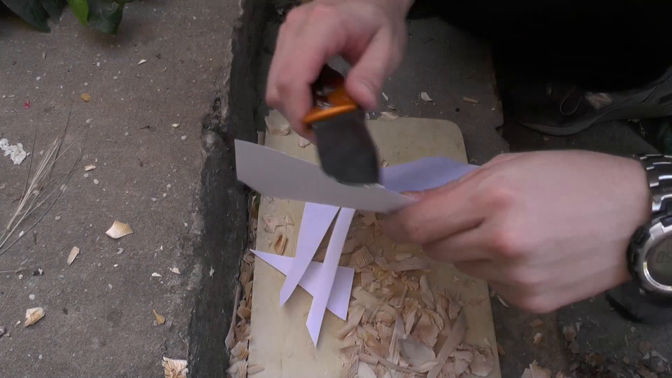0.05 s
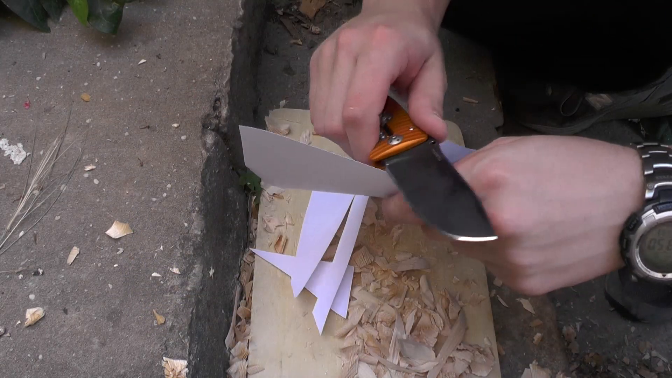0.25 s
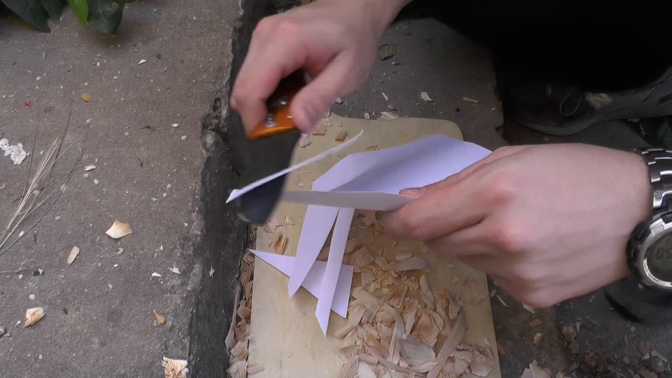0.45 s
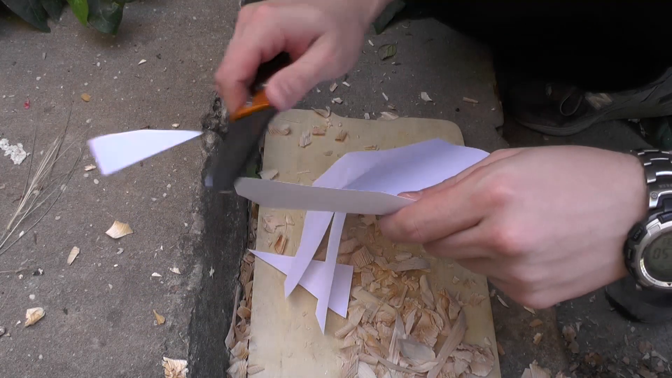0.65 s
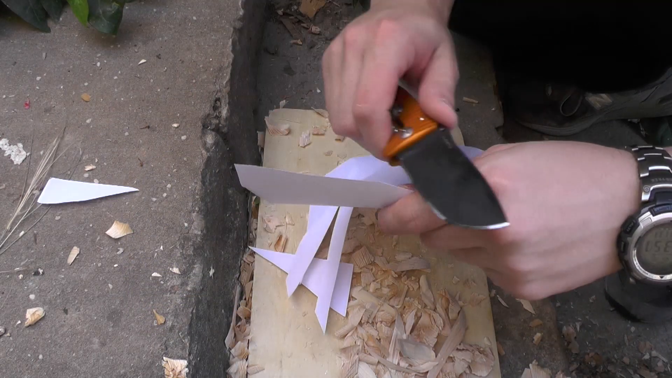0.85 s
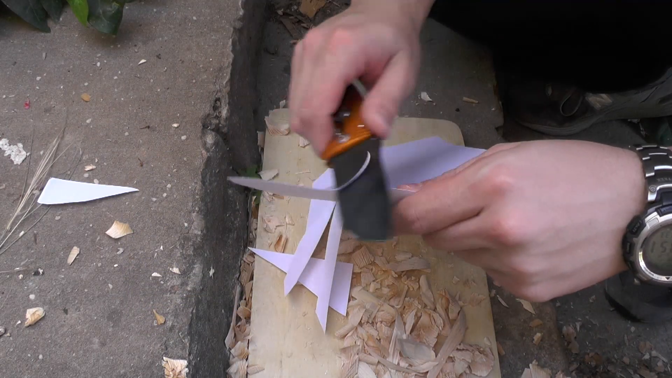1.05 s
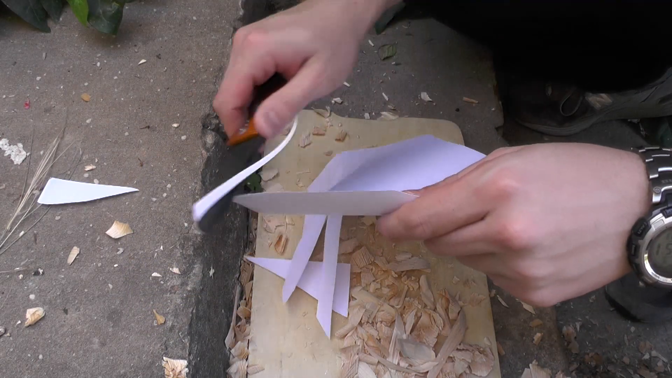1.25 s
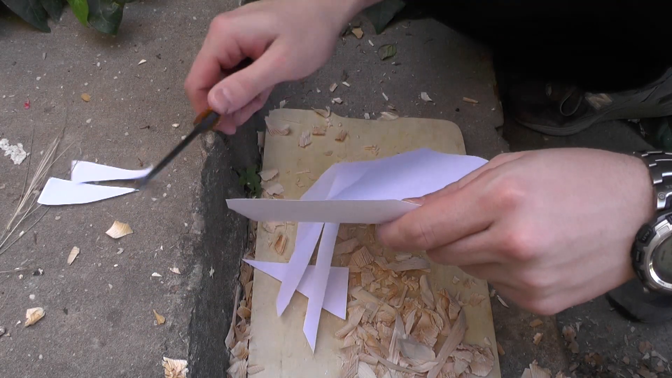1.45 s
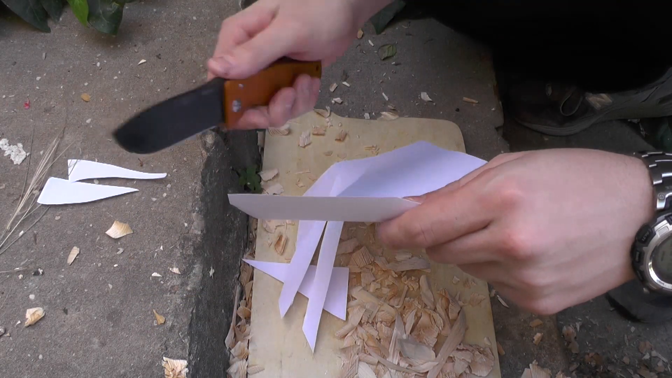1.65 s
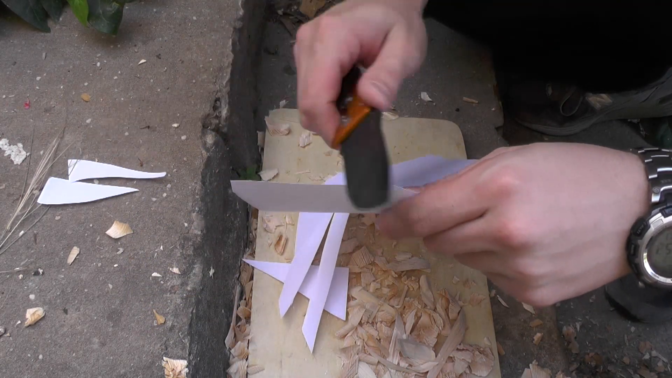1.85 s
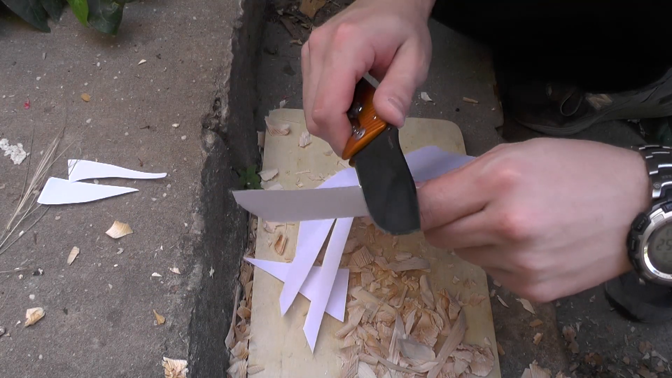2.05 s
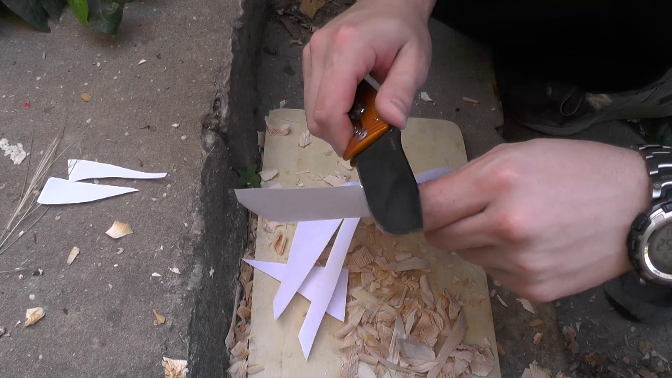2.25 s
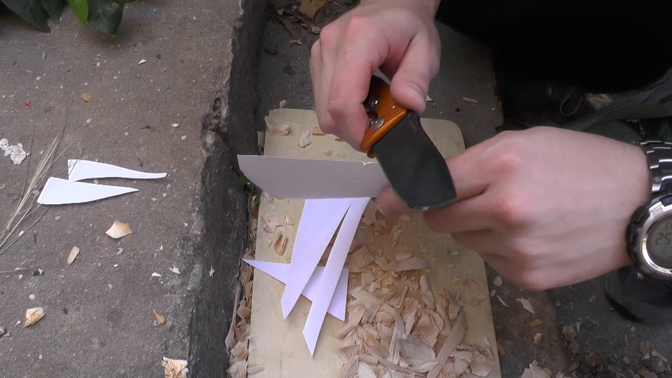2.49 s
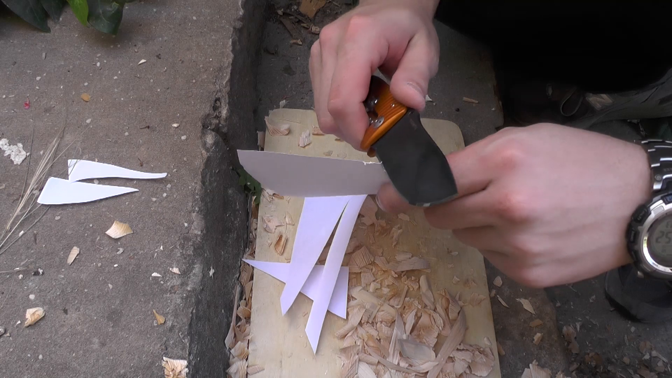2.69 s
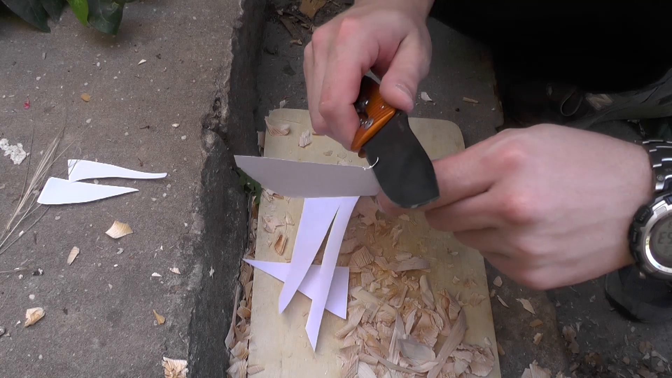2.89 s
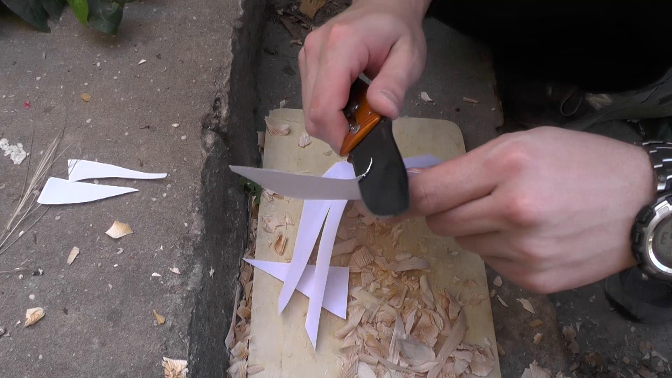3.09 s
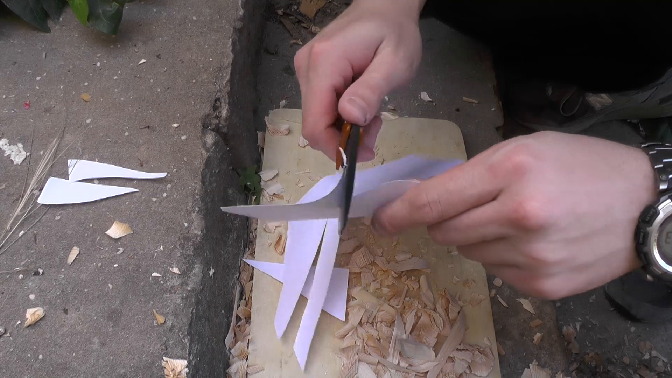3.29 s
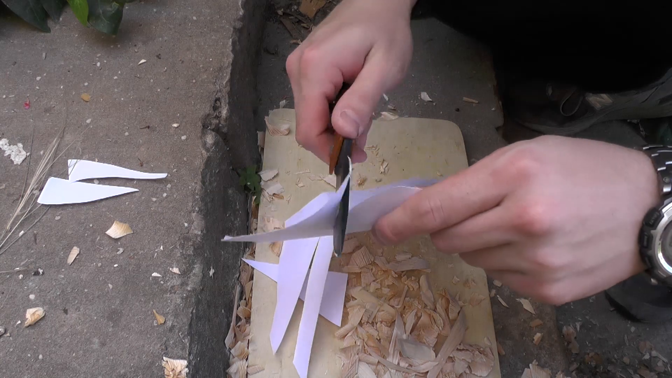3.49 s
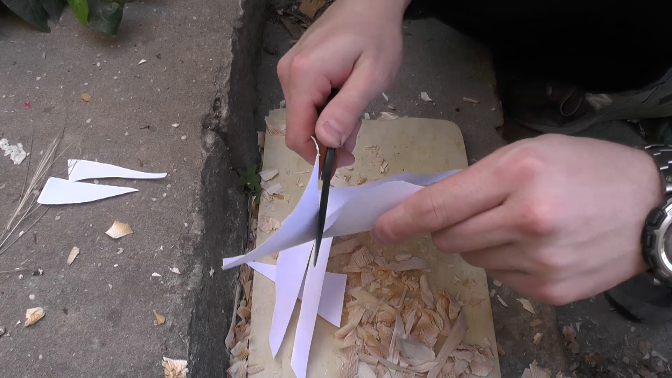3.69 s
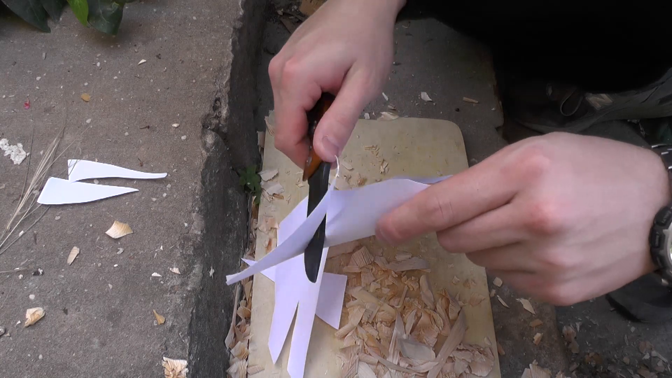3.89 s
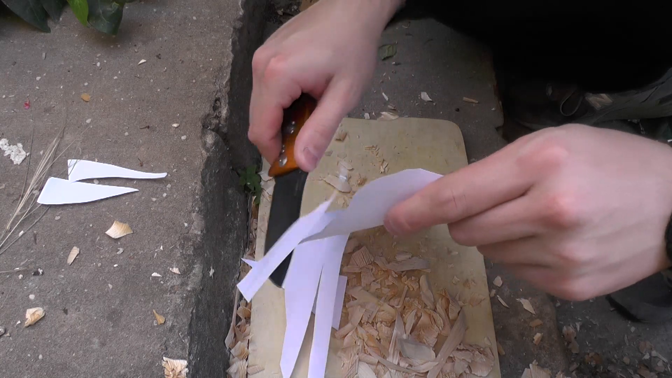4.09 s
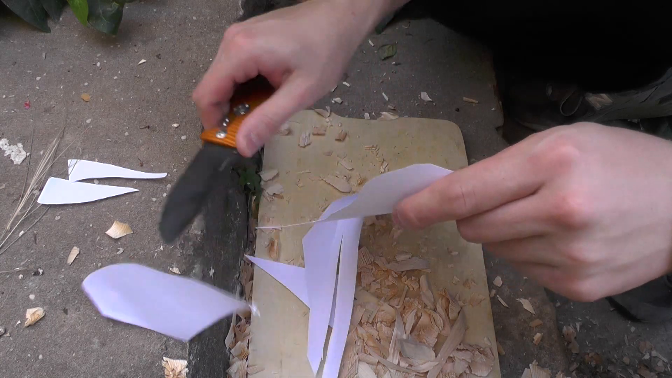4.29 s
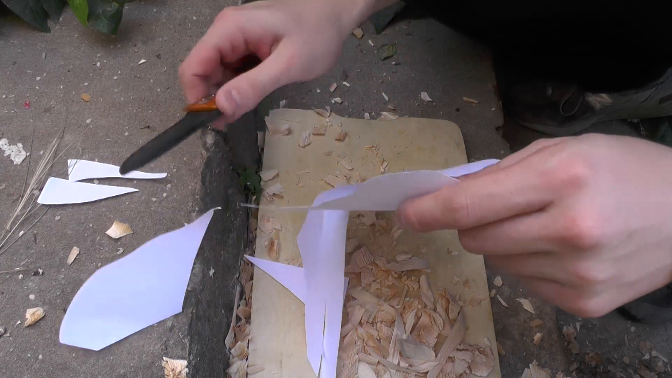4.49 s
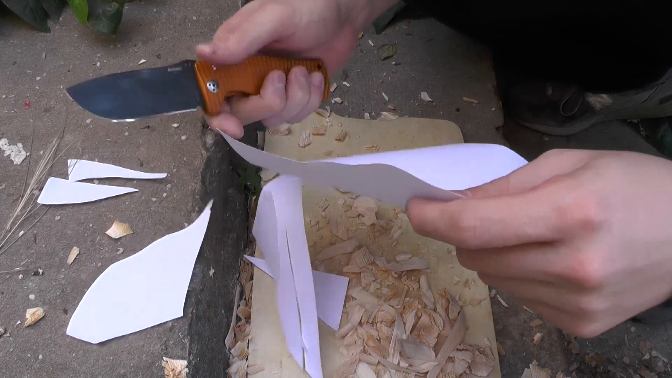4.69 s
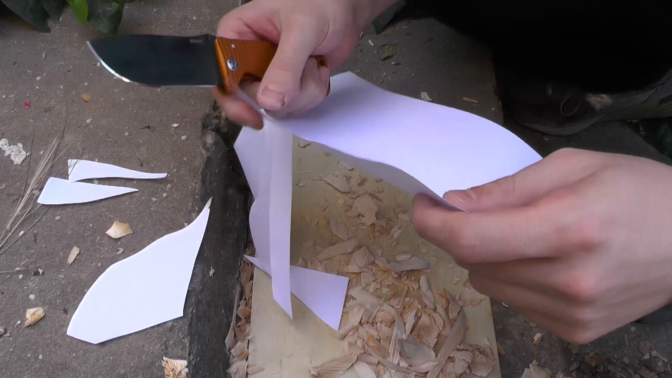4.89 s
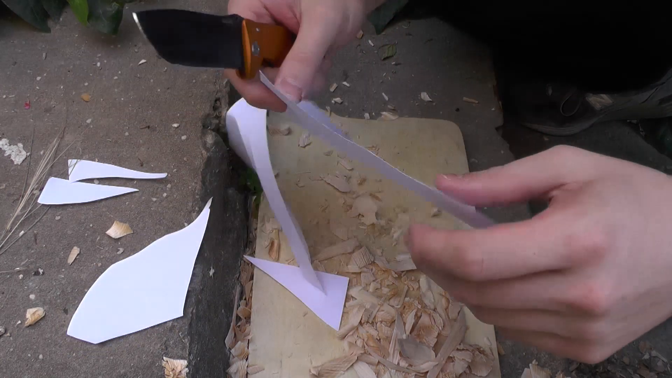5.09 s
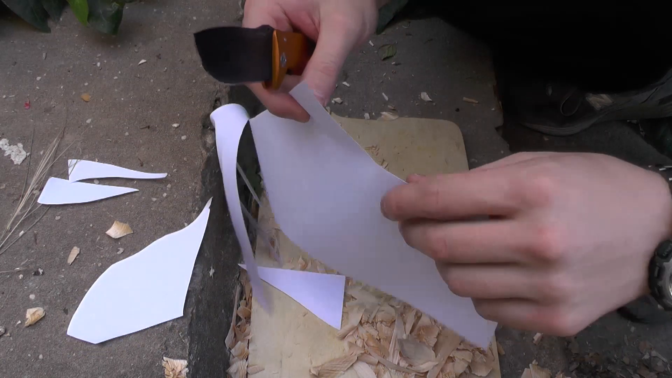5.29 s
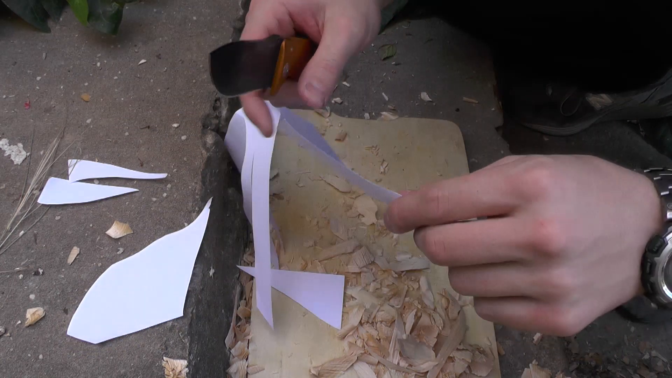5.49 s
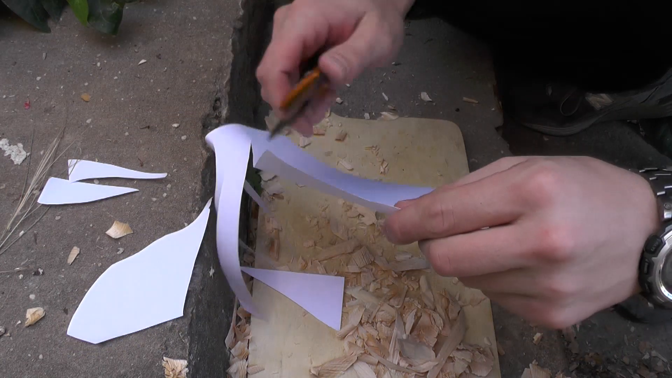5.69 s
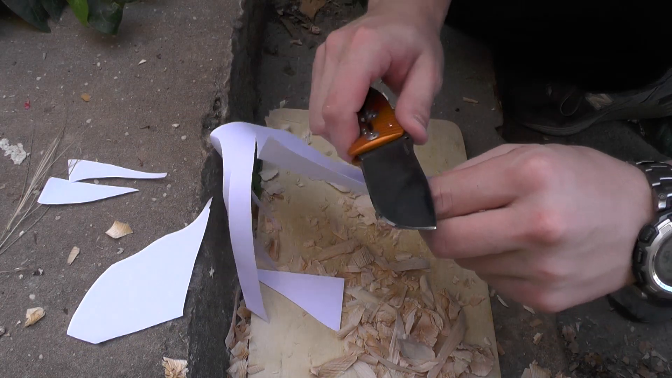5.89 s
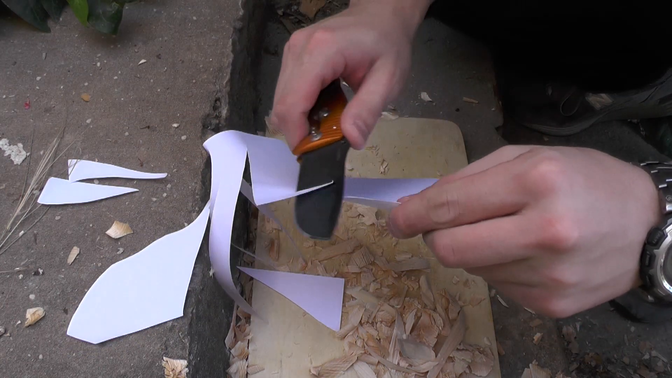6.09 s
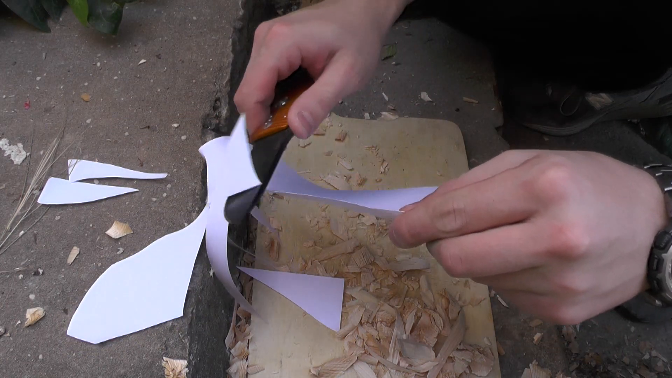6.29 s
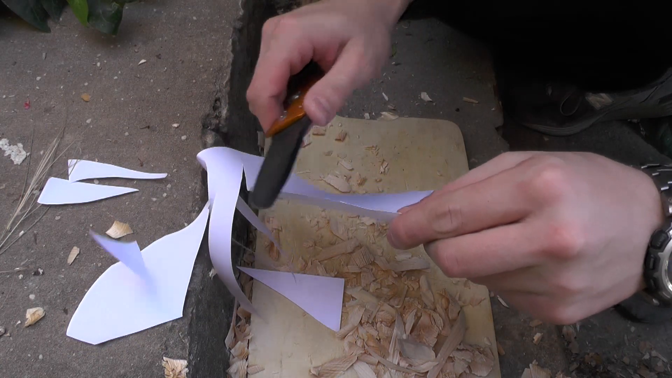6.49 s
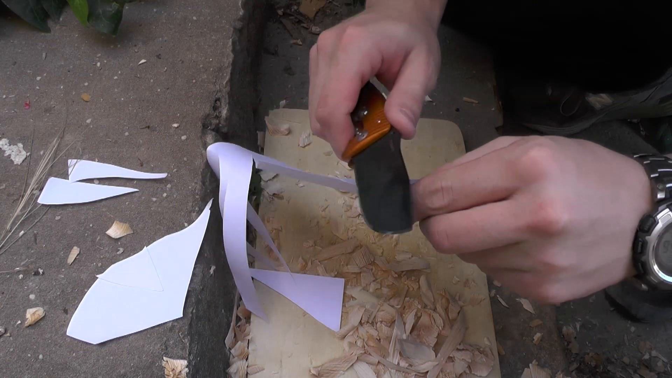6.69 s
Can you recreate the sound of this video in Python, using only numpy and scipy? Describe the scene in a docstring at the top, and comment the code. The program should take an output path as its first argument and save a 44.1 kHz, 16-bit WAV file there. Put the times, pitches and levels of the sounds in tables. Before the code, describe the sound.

A knife slices a hand-held sheet of paper in quick crisp zips, then one long rising tear-like cut, with rustles, flicks and light landings.

```python
"""Over a concrete floor, close to one microphone, a knife slices a hand-held sheet of paper over low noise.
Three quick cuts come first: snapping fibres ring the sheet; between them it rubs, scraps land, steel rings.
A slow cut follows from 2.7 to 4.2 s, its gliding resonances rising as the uncut paper shortens, amid air puffs.
The sheet then rubs, flicks and ticks as its modes and creases are shaken, until a fourth quick cut at 6 s.
At the end the last strip meets the floor with a scuff and a ping."""
import sys
import numpy as np
from scipy import signal
from scipy.fft import rfft, irfft, next_fast_len
from scipy.io import wavfile
from scipy.ndimage import uniform_filter1d, map_coordinates

SR = 44100
rng = np.random.default_rng(int(sys.argv[2]) if len(sys.argv) > 2 else 0)


def wrap_up_sound(samples):
    """Save the sound to the file named by the first command line argument, as 16-bit audio."""
    columns = np.atleast_2d(samples).T
    # keep every value between -1 and 1, then stretch to whole-number steps
    tamed = np.clip(columns, -1, 1)
    steps = np.round(tamed * 32767).astype(np.int16)
    wavfile.write(sys.argv[1], SR, steps)


N = 297586

# quick knife strokes: start t/s, end t/s, force level/dB, build-up t/s, easing off t/s,
# edge hiss level/dB re force, fastest moment t/s, flap level/dB re force, strip resonance f/Hz
QUICK_CUTS = [(0.3127, 0.518, -20, 0.058, 0.012, -1.3, 0.402, -25.5, 2590),
              (1.02, 1.256, -21, 0.021, 0.0017, -2.3, 1.127, -23, 2610),
              (2.012, 2.078, -30.5, 0.0018, 0.0084, -8, 2.068, -15.5, 2320),
              (6.018, 6.273, -21, 0.083, 0.05, -3, 6.1, -22, 4200)]
CUT_RELEASE_S = 0.004


def amp(db):
    """Decibels to gain."""
    return 10 ** (np.asarray(db) / 20)


def unit(x):
    """Scale to rms 1."""
    return x / np.sqrt(np.mean(x ** 2) + 1e-20)


def along(points, hz):
    """Read (Hz, value) points on a log frequency axis."""
    f, v = np.transpose(points)
    return np.interp(np.log(hz + 1), np.log(f + 1), v)


def clock():
    """Time of every sample in seconds."""
    return np.arange(N) / SR


def wobble(rate):
    """A smooth random curve, rate knots a second."""
    knots = rng.standard_normal(int(N * rate / SR) + 4)
    return map_coordinates(knots, [clock() * rate])


def filtered(x, response):
    """x times a response of frequency."""
    m = next_fast_len(len(x) + 8192)
    hz = np.fft.rfftfreq(m, 1 / SR)
    return irfft(rfft(x, m) * response(hz), m)[:len(x)]


def band(x, lo_hz, hi_hz):
    """One band of x, its slow level held at 1."""
    y = filtered(x, lambda hz: ((1 + (lo_hz / (hz + 1)) ** 12) * (1 + (hz / hi_hz) ** 12)) ** -.5)
    slow_power = np.abs(uniform_filter1d(y ** 2, size=3000))
    return y / np.sqrt(slow_power + 1e-12)


def gate(start, end, attack, release):
    """Contact rises when a stroke starts, holds near 1 and dies away after its end."""
    t = clock()
    rise = 1 - np.exp(-np.maximum(t - start, 0) / attack)
    return rise * np.exp(-np.minimum(np.maximum(t - end, 0) / release, 20))


def background():
    """Steady low noise of the surroundings whose middle swells slowly."""
    # spectral shape of the place: f/Hz, relative level/dB per Hz
    place_colour = [(20, -10), (60, -1), (160, 0), (340, -7), (750, -5.5), (1300, -9.5), (1900, -16.5),
                    (2400, -21), (3200, -22), (5000, -26), (8000, -33), (10000, -30), (15500, -29)]
    air = unit(filtered(rng.standard_normal(N), lambda hz: amp(along(place_colour, hz))))
    middle_shape = [(200, -21.5), (550, 11.5), (1600, 11.5), (5000, -28)]
    middle = filtered(air, lambda hz: amp(along(middle_shape, hz)))
    swell = amp(0.3 * wobble(1.5))  # the boosted middle deepens this small swell
    return amp(-52.5) * (air + (swell - 1) * middle)


def room(x):
    """A short scatter from the floor and nearby walls, as noise that decays faster in the treble."""
    # decay by frequency: f/Hz, t60/s
    decay_times = [(200, 0.35), (2000, 0.09), (12000, 0.08)]
    hz, t, z = signal.stft(rng.standard_normal(SR // 3), SR, nperseg=256)
    decay = amp(-60 * t / along(decay_times, hz)[:, None])
    tail = signal.istft(z * decay, SR, nperseg=256)[1]
    delayed = np.pad(tail, (SR // 300, 0))
    return signal.fftconvolve(x, delayed / np.linalg.norm(tail))[:N]


def puffs():
    """The moving sheet pushes soft low buffets of air against the microphone."""
    # buffets: t/s, level/dB, half length t/s (to 1/e)
    buffets = [(3.57, -49, .05), (3.81, -38.5, .045), (4.17, -48, .03)]
    push = sum(amp(db) * np.exp(-((clock() - s) / length) ** 2) for s, db, length in buffets)
    colour = [(20, -10), (50, 0), (110, -5), (300, -24), (2000, -80)]
    return push * unit(filtered(rng.standard_normal(N), lambda hz: amp(along(colour, hz))))


def blade():
    """Faint steel modes hang on after the first cut, wavering as the knife turns."""
    # thin ring of the freed blade: start t/s, f/Hz, starting level/dB, t60/s
    steel_modes = [(0.53, 2280, -50, .55), (0.73, 4484, -65, 2.4), (0.78, 4953, -66, 2.4)]
    t, out = clock(), 0
    for s, hz, db, t60 in steel_modes:
        level = db - 60 * np.abs(t - s) / t60 + 3.5 * wobble(35)
        out = out + (t > s) * amp(level) * np.sin(2 * np.pi * hz * t)
    return out


def tap(s, db, pitch, spread, t60):
    """A tap shakes a cluster of quickly damped paper modes around its pitch."""
    out, t = np.zeros(N + SR), np.arange(SR // 6) / SR
    cluster = lambda hz: 1 / (1 + (np.log2((hz + 1) / pitch) / spread) ** 2) ** 0.77
    ring = filtered(rng.standard_normal(len(t)), cluster)
    fade = amp(-60 * t / t60) * (1 - np.exp(-t / (t60 * 0.056)))
    # 8.5 dB brings the noise's rms near its nominal peak
    out[round(s * SR):][:len(t)] = amp(db + 8.5) * unit(ring * fade) * np.sqrt(np.mean(fade ** 2))
    return out[:N]


def landings(count):
    """Strips touch the concrete and skip, count touches each; the last lands once on its stiff edge."""
    # strips landing flat: t/s, nominal peak level/dB
    falls = [(0.807, -45.5), (1.485, -37)]
    # last strip, a scuff and a ping: t/s, nominal peak level/dB, f/Hz, spread/octaves, t60/s
    edge_landing = [(6.658, -52, 8900, 1.2, 0.13), (6.66, -41, 2186, 0.04, 0.052)]
    skip_s, skip_loss_db = 0.017, 1.5
    skips = sum(tap(s + k * skip_s, db - k * skip_loss_db, pitch=10440, spread=0.21, t60=0.023)
                for s, db in falls for k in range(count))
    return skips + sum(tap(*row) for row in edge_landing)


def snaps(rate, scatter_db, clump_db, clump_rate):
    """Fibres breaking at random, in clumps where the paper is denser."""
    breaks = rng.random(N) < rate / SR
    sizes = rng.standard_normal(N) * amp(scatter_db * rng.standard_normal(N))
    return unit(breaks * sizes * amp(clump_db * wobble(clump_rate)))


def sheet(x, patchy_db):
    """The sheet's colour: resonances that come and go, and small ones that wander as it bends."""
    # spectral shape of the paper: f/Hz, relative level/dB per Hz
    fibre_colour = [(150, -24), (340, -18.5), (490, -22), (630, -13), (800, -6.5), (1020, -19), (1380, -1),
                    (1870, -3), (2750, -1), (4270, -0.5), (5400, -4), (7700, -10), (10000, -6), (13000, -6),
                    (14800, -9.5), (16000, -13.5)]
    # resonances in every quick cut: f/Hz, width f/Hz, boost level/dB
    sheet_modes = [(2140, 200, 2), (2580, 550, 3), (3540, 295, 1.5), (4230, 1300, 3.5), (6030, 590, 5.5),
                   (9340, 450, 2), (11100, 500, -1), (13200, 210, 1), (15300, 1100, 5)]
    # slow-cut resonances, rising as the uncut paper shortens:
    # start t/s, end t/s, first f/Hz, last f/Hz, width f/Hz, boost level/dB
    gliding_modes = [(2.6, 3.12, 2660, 2700, 600, 11), (3.12, 3.8, 1400, 1480, 600, 9.5),
                     (3.1, 4.2, 2230, 3080, 540, 9.5), (3.2, 3.74, 4600, 4920, 650, 8),
                     (4.04, 4.25, 5880, 6020, 750, 11)]
    strip_boost_db, strip_width = 4.5, 1  # width as a share of the strip's pitch
    hz, t, z = signal.stft(x, SR, nperseg=512, noverlap=384)
    patches = uniform_filter1d(rng.standard_normal(z.shape), size=3, axis=0)
    patches = unit(uniform_filter1d(patches, size=18, axis=1))
    db = along(fibre_colour, hz)[:, None] + patchy_db * patches
    present = lambda start, end: np.clip(np.minimum(t - start, end - t) / 0.23 + .5, 0, 1)
    hump = lambda centre, width: 2 ** -(2 * (hz[:, None] - centre) / width) ** 2
    shared = sum(boost * hump(centre, width) for centre, width, boost in sheet_modes)
    for start, end, *_, strip_hz in QUICK_CUTS:
        cutting = (t > start - 0.02) & (t < end + 0.02)
        db = db + cutting * (shared + strip_boost_db * hump(strip_hz, strip_width * strip_hz))
    for start, end, first, last, width, boost in gliding_modes:
        centre = np.interp(t, [start, end], [first, last])
        db = db + boost * present(start, end) * hump(centre, width)
    return signal.istft(z * amp(db), SR, nperseg=512, noverlap=384)[1][:N]


def slides():
    """Paper rubs lightly on paper, fingers and blade: sparser grains through the same sheet."""
    # rubs: start t/s, strongest t/s, end t/s, level/dB, hiss level/dB re that
    rubs = [(0.52, 0.54, 0.71, -58, 0), (1.26, 1.29, 1.5, -57, 1), (2.13, 2.19, 2.27, -63, -3),
            (4.245, 4.302, 4.32, -45, 12), (4.52, 4.64, 4.83, -53, -6), (4.9, 4.99, 5.09, -56, -1),
            (5.14, 5.26, 5.4, -51, -7), (6.27, 6.38, 6.44, -58, -3), (6.53, 6.66, 6.7, -58, -3)]
    rise_db, fall_db, edge_s = 10, 9, 0.0062  # swell, fade, and how fast contact is made and lost
    gains = 0
    for start, top, end, db, hiss_db in rubs:
        level = np.interp(clock(), [start, top, end], [db - rise_db, db, db - fall_db])
        contact = gate(start, end, edge_s, edge_s)
        gains = gains + amp(level) * contact * amp([[0], [hiss_db]])
    mid, hiss = gains
    grains = snaps(rate=7000, scatter_db=3, clump_db=1.6, clump_rate=160)
    rub = sheet(grains, patchy_db=4.5)
    return mid * band(rub, 2200, 7300) + hiss * band(rub, 8600, 17000)


def ticks():
    """Creases snap as the sheet is bent and gripped anew; near the end a small scrap ticks as it lands."""
    # small creases, and last a scrap landing: t/s, nominal peak level/dB, f/Hz
    creases = [(0.797, -42.5, 2900), (2.867, -40, 3800), (3.904, -23.5, 3180), (4.19, -19, 6900),
               (4.3448, -28.5, 6400), (4.601, -42.5, 5370), (4.7248, -40.5, 6500), (4.736, -35.5, 5570),
               (4.783, -42.5, 5900), (4.818, -43, 11600), (5.169, -41, 8900), (6.586, -46, 10100)]
    return sum(tap(s, db, pitch, spread=0.65, t60=0.013) for s, db, pitch in creases)


def flicks():
    """The whole sheet, flicked or bumped, rings: sharp flicks favour high modes, soft bumps low ones."""
    # flicks and bumps: t/s, nominal level/dB, brightness/dB per octave, t60/s
    shakes = [(2.2977, -31, 3.5, 0.019), (2.321, -44.5, -9, 0.042), (3.687, -23.5, 5, 0.017),
              (4.3457, -28.5, 4, 0.023), (4.405, -35, -5, 0.023), (4.537, -44.5, 7.5, 0.037),
              (4.9119, -28, -6.5, 0.045), (4.929, -36.5, -11.5, 0.091), (5.2489, -29.5, 1, 0.024)]
    # modes of the shaken sheet: f/Hz, relative level/dB, spread/octaves
    shaken_modes = [(716, -15, 0.3), (1376, -2, 0.2), (2484, 0, 0.092), (3160, -6, 0.041),
                    (4130, -3.5, 0.21)]
    hz, mode_db, spread = np.transpose(shaken_modes)
    out = 0
    for s, db, brightness, t60 in shakes:
        tilted = mode_db + brightness * np.log2(hz)
        levels = db + tilted - tilted.max() - 3  # strongest mode 3 dB under the flick's level
        out = out + sum(tap(s, level, pitch, width, t60)
                        for level, pitch, width in zip(levels, hz, spread))
    return out


def bounces(x, share, drift_s, count):
    """Copies off hands, blade and floor; their paths change as the hands move, so fine ripples shift."""
    t, out = clock(), x
    for delay in rng.uniform(.0007, .004, count):
        sign = rng.choice([-1, 1])
        arrival = (t - delay - drift_s * wobble(4)) * SR
        out = out + share * sign * map_coordinates(x, [arrival], order=0)
    return out


def quick_cut(start, end, db, build, ease, hiss_db, fastest, flap_db):
    """Gains of (mid band, flap, edge): the blade bites, presses on, zings at full speed and eases off."""
    bite_db, bite_dull_db = 10.5, 5.5  # the edge enters this much weaker, its hiss weaker still
    press_db, ease_db_per_s = 1.5, 275.5  # force grows along the cut and falls as the hand eases off
    flap_grows_db, flap_power = 10, 2.9  # the flap booms mostly just before it comes free
    zing_db, zing_s = 5.5, 0.03  # extra hiss at full speed, half length to 1/e
    judder_db, judder_rate = 0.6, 45  # the edge catches unevenly, knots per s
    t = np.clip(clock(), start, end)
    done = (t - start) / (end - start)
    bite = np.maximum(1 - (t - start) / build, 0)
    easing = ease_db_per_s * np.maximum(t - end + ease, 0)
    force = db - bite_db * bite - press_db * (1 - done) - easing
    flap = force + flap_db + bite_db * bite / 2 + flap_grows_db * done ** flap_power
    zing = zing_db * np.exp(-((t - fastest) / zing_s) ** 2)
    edge = force + hiss_db - bite_dull_db * bite ** 2 + zing
    levels = [level + judder_db * wobble(judder_rate) for level in (force, flap, edge)]
    return amp(levels) * gate(start, end, 0.007, CUT_RELEASE_S)


def slow_cut():
    """Gains of (mid band, flap, edge) as the blade is drawn slowly down the whole sheet."""
    # cutting force: t/s, mid-band level/dB, edge hiss level/dB re force
    slow_force = [(2.675, -50.5, 2), (2.767, -43, -1), (2.865, -42, 4.5), (2.911, -49.5, 0),
                  (2.997, -35.5, 0.5), (3.057, -37.5, -3), (3.171, -29, -3), (3.303, -26.5, -2),
                  (3.361, -30.5, -2), (3.565, -26.5, -7), (3.573, -28.5, -4.5), (3.685, -26.5, -2.5),
                  (3.705, -30, -6), (4.037, -26, -2), (4.131, -32, 3.5), (4.193, -31, 7.5), (4.2, -41, 8)]
    # low end of the flap: t/s, level/dB
    flap_levels = [(2.68, -64.5), (3.154, -51), (3.276, -40), (3.28, -37.5), (3.586, -43.5), (3.61, -56),
                   (3.7, -38.5), (4.106, -52), (4.2, -46)]
    s, db, hiss_db = np.transpose(slow_force)
    t = clock()
    force = np.interp(t, s, db)
    flap = np.interp(t, *np.transpose(flap_levels))
    edge = np.interp(t, s, db + hiss_db)
    return amp([force, flap, edge]) * gate(s[0], s[-1], 0.015, CUT_RELEASE_S)  # the edge eases in


def cuts():
    """The edge parts fibres; the freed flap radiates the low end, the edge itself the hiss."""
    mid, flap, edge = slow_cut() + sum(quick_cut(*stroke) for *stroke, strip_hz in QUICK_CUTS)
    fibres = snaps(rate=28000, scatter_db=1, clump_db=1.7, clump_rate=330)
    fibres = bounces(fibres, share=.2, drift_s=.00016, count=5)
    tear = sheet(fibres, patchy_db=2.5)
    low = flap * band(tear, 150, 968)
    body = mid * band(tear, 1180, 6940)
    hiss = edge * band(tear, 7060, 17000)
    return low + body + hiss


def scene():
    """Everything reaches one microphone, sent alike to both channels."""
    paper = cuts() + slides() + flicks() + ticks() + landings(count=3)
    mono = paper + amp(-13.0) * room(paper) + blade() + puffs() + background()
    return np.array([mono, mono])


def record(dry):
    """The recorder rounds off the tallest peaks and keeps nothing above its band limit."""
    top_hz = 16200
    soft = dry / (1 + np.abs(dry / .62) ** 4) ** .25
    low_pass = lambda hz: np.clip((top_hz - hz) / 300 + .5, 0, 1)
    return np.array([filtered(x, low_pass) for x in soft])


dry = scene()
out = record(dry)
wrap_up_sound(out)
```